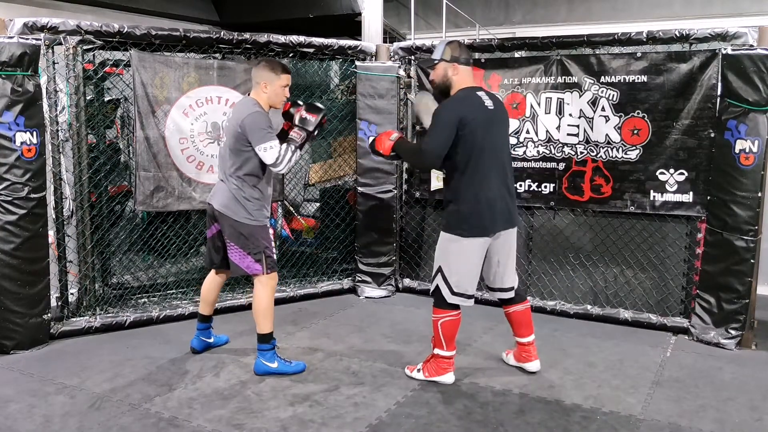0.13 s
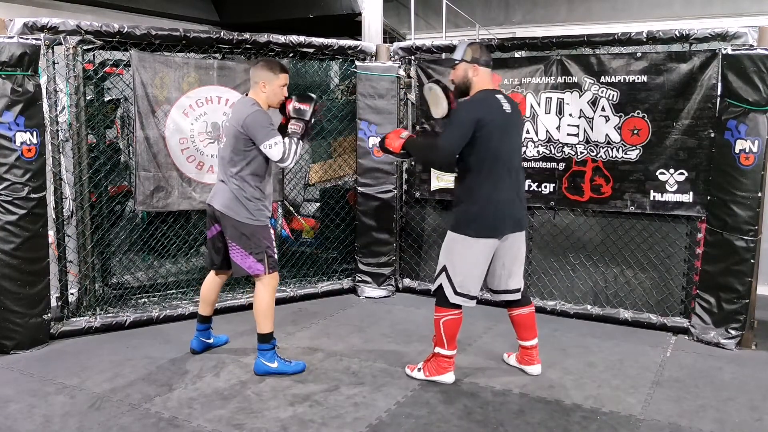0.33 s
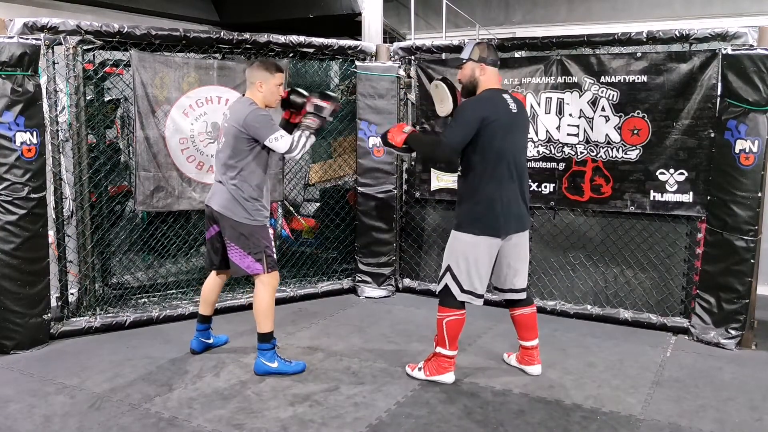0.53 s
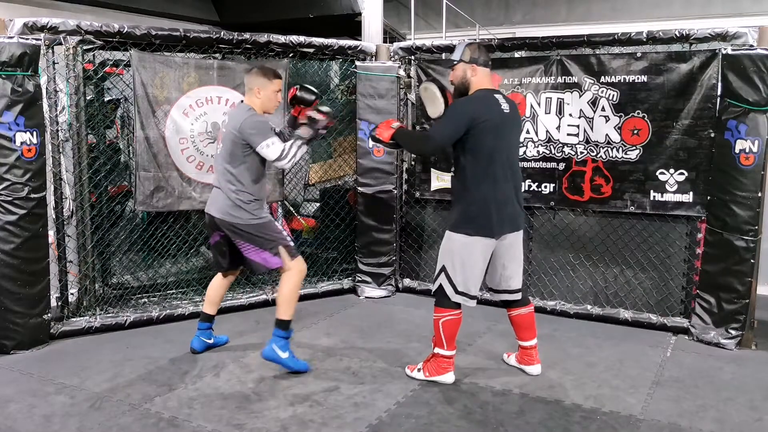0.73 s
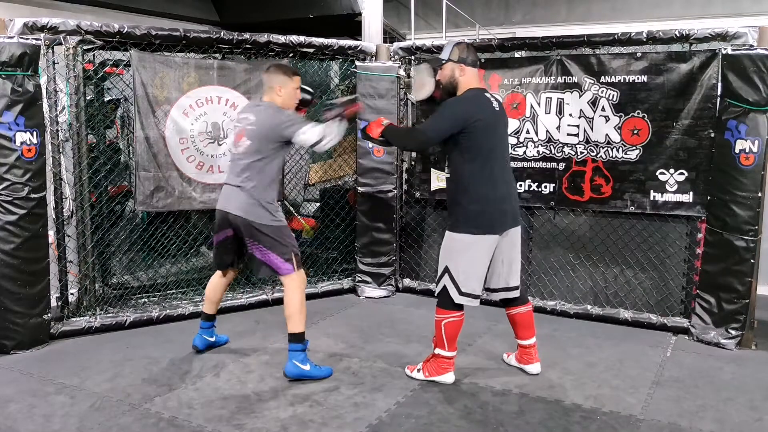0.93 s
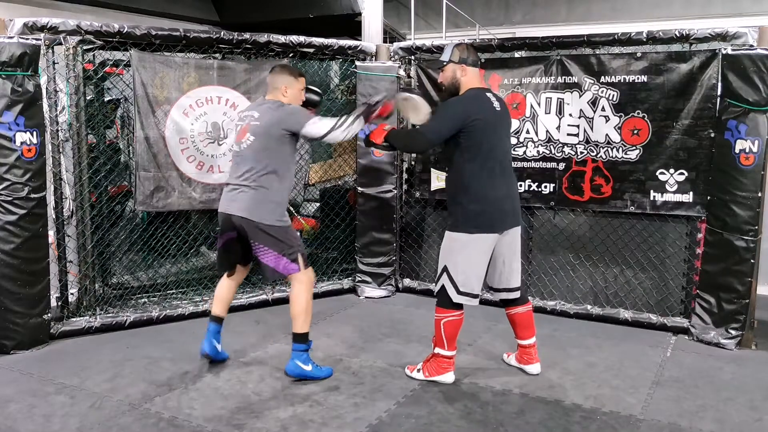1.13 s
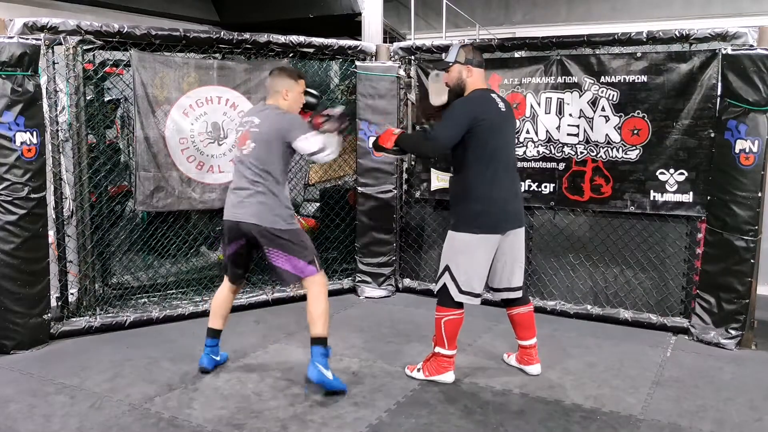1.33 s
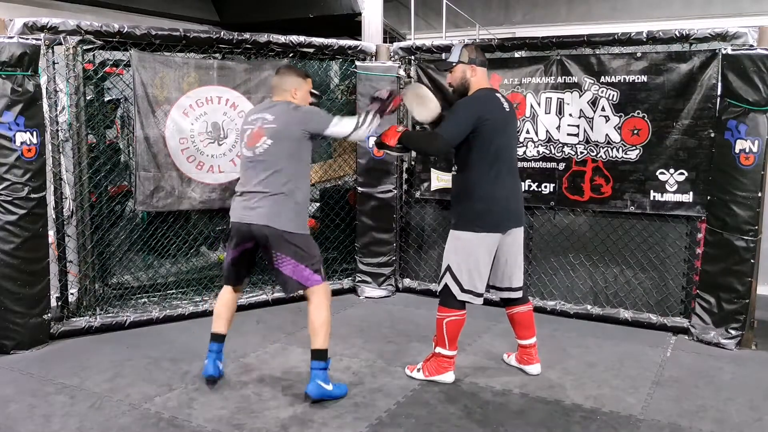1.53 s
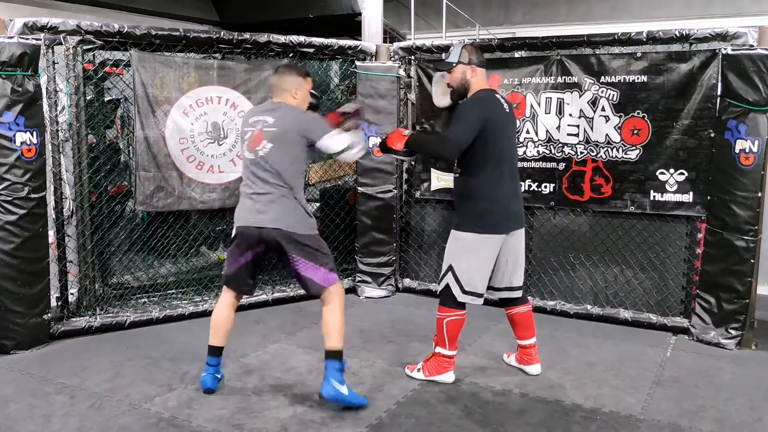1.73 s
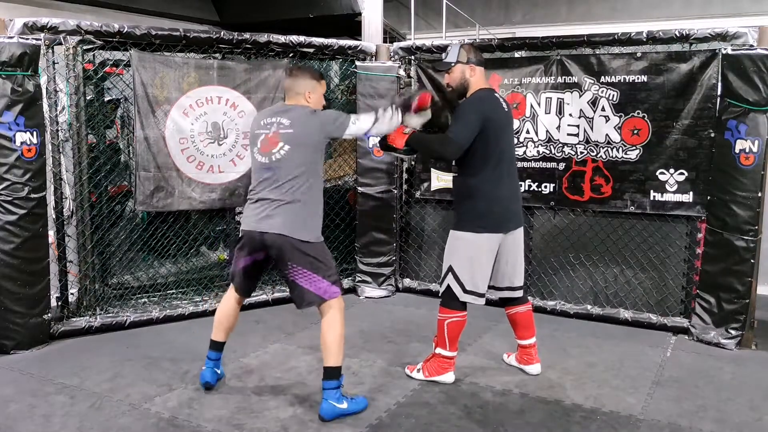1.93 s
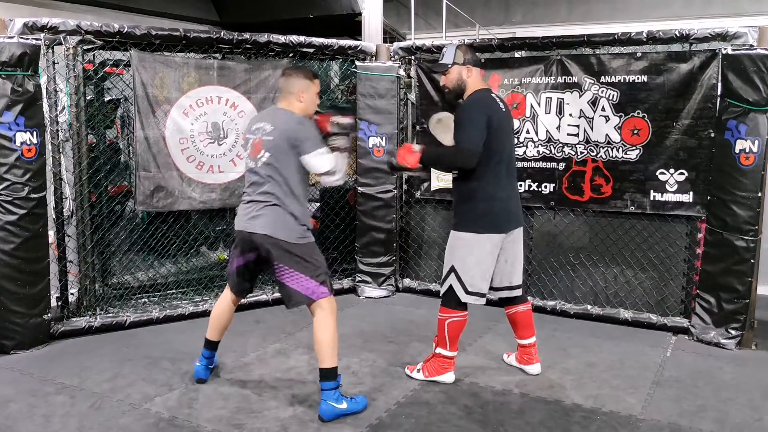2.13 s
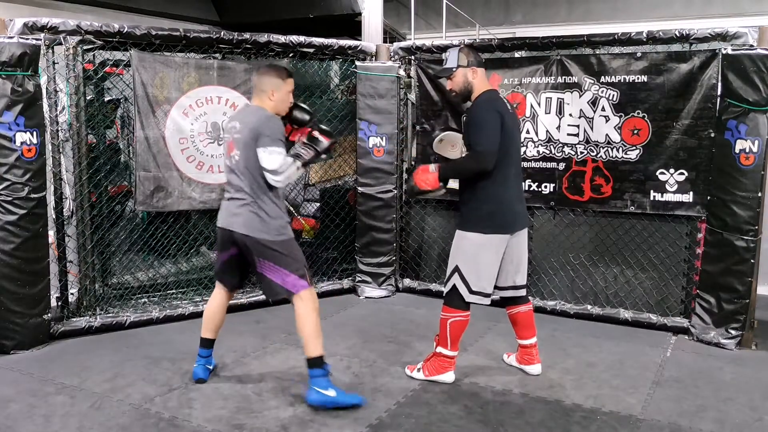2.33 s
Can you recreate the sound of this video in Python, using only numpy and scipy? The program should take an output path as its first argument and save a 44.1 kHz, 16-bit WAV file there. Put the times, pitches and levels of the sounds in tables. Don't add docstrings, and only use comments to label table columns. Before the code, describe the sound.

Leather glove jabs crack into a mitt three times, first softer, with shoe scuffs and ringing hall

```python
import sys
import numpy as np
from scipy import signal
from scipy.fft import rfft, irfft
from scipy.io import wavfile

SR = 44100
rng = np.random.default_rng(int(sys.argv[2]) if len(sys.argv) > 2 else 0)


def gain_from_decibels(decibels):
    exponent = np.asarray(decibels, float) / 20
    return 10 ** exponent


def int16_out(signal):
    q = np.round(np.clip(np.atleast_2d(signal).T, -1, 1) * 32767)
    wavfile.write(sys.argv[1], SR, q.astype(np.int16))


N = 109764

BAND_EDGES = 22 * 2 ** np.arange(0, 9.7, 1 / 3)
BANDS = np.sqrt(BAND_EDGES[1:] * BAND_EDGES[:-1])

# (time [s], snap peak level [dB])
CONTACTS = [
    (.8387, -12),
    (1.25632, 1),
    (1.6501, -2),
]
# (thump level [dB], tail level [dB], tail brightness [dB per octave])
JABS = [
    (-18, -24, -1.0),
    (-15.5, -20.5, 1.5),
    (-13.5, -20, 0.49),
]
# (frequency [Hz], level to the left [dB])
BASS_PAN = [(25, -1.5), (60, 3.5), (125, .1), (300, 0)]


def at_hz(points, hz):
    table_hz, values = np.array(points).T
    return np.interp(np.log(hz), np.log(table_hz), values)


def share(points):
    power = gain_from_decibels(2 * at_hz(points, BANDS)) * BANDS
    return power / np.sum(power)


def bump(centre_hz, octaves):
    bell = spike(np.log2(BANDS / centre_hz), 0, octaves)
    return bell / np.sum(bell)


def drift(rate):
    r = np.exp(-80 * np.pi * rate / SR)
    slow = signal.lfilter([1], [1, -2 * r, r * r], rng.standard_normal(N // 40 + 2002))[2000:]
    return np.interp(np.arange(N) / 40, np.arange(len(slow)), slow / slow.std())


def spike(t, s, width_s):
    return np.exp(-.5 * ((t - s) / width_s) ** 2)


def ring(t, hz, t60):
    t = np.maximum(t, 0)
    return np.sin(2 * np.pi * hz * t) * gain_from_decibels(-60 * t / t60)


def fade(t, rise_s, t60):
    t = np.maximum(t, 0)
    return (1 - np.exp(-t / rise_s)) ** 2 * gain_from_decibels(-120 * t / t60)


def leather_snaps(t):
    # (delay [ms], level [dB], width [ms])
    snap_steps = [
        (0, 0, .018),
        (.12, -9, .02),
        (.24, -9, .03),
        (.08, -17, .1),
        (-1.7, -24, .018),
    ]
    snaps = np.zeros(len(t))
    for ms, db, width_ms in snap_steps:
        level_luck, time_luck = rng.normal(0, 1, 2)
        snaps -= gain_from_decibels(db + 1.5 * level_luck) * spike(t, (ms + 0.005 * time_luck) / 1000, width_ms / 1000)
    rebound = signal.butter(1, 930, "high", fs=SR)
    return signal.lfilter(*rebound, snaps) - gain_from_decibels(-10) * ring(t, 2000, .003)


def squeezed_air(t):
    before_s, after_s, centre_hz = .0015, .0003, 3500
    band = signal.butter(1, [centre_hz / 2, centre_hz * 2], "band", fs=SR)
    hiss = signal.lfilter(*band, rng.standard_normal(len(t)))
    return gain_from_decibels(-24) * hiss * np.exp(-np.abs(t) / np.where(t < 0, before_s, after_s))


def pad_thump(t):
    # (frequency [Hz], level [dB], t60 [s])
    pad_modes = [(150, -6.5, 0.033), (343, -4.5, 0.046), (439, -4.5, 0.058), (1890, -35, 0.0037)]
    thump = -sum(gain_from_decibels(db + 0.75 * rng.normal()) * ring(t, hz, t60) for hz, db, t60 in pad_modes)
    return signal.lfilter(*signal.butter(2, 90, "high", fs=SR), thump)


def slap(t, snap_db, thump_db):
    return gain_from_decibels(snap_db) * (leather_snaps(t) + squeezed_air(t)) + gain_from_decibels(thump_db) * pad_thump(t)


def early_room(t):
    # (delay [ms], level [dB], dull above [Hz], left over right [dB])
    reflections = [
        (1.95, -2, 20000, 0),
        (2.82, 2, 5000, -1),
        (7.25, -5, 14000, -1),
        (8.08, 1, 5000, -2),
        (9.7, -4, 7000, -4),
        (13.3, -4, 7000, 3),
        (14.5, -7, 9000, 0),
    ]
    out = np.zeros((2, len(t)))
    out[:, 0] = 1
    for ms, db, dull_hz, pan_db in reflections:
        pulse = spike(t, ms / 1000, .13 / dull_hz + .25 / SR)
        out += gain_from_decibels([[db + pan_db / 2], [db - pan_db / 2]]) * pulse / pulse.sum()

    start_ms, end_ms, scatter_db, scatter_t60_s = 3.1, 70, -3.5, 0.17
    port_lag_s = .0004
    when, polarity, loss, direction = rng.random(size=(70, 4)).T
    s = (start_ms + (end_ms - start_ms) * when) / 1000
    size = np.where(polarity < .7, 1, -1) * gain_from_decibels(scatter_db - 60 * s / scatter_t60_s - 18 * loss)
    for side, sign in zip(out, (1, -1)):
        bearing = sign * (direction - .5)
        arrival = ((s + bearing * port_lag_s) * SR).astype(int)
        np.add.at(side, arrival, size * gain_from_decibels(18.0 * bearing))
    return out


def jabs():
    # (frequency [Hz], level [dB], t60 [s])
    room_modes = [(48.84, -42, 2), (159.7, -32, 1.04), (194, -41, 2.2), (281, -39.5, 1.56),
                  (316.6, -51.5, 2.1), (370.3, -37, 0.93), (428, -27, 0.51), (552, -48.5, 0.28)]
    out, t = np.zeros((2, N + SR)), np.arange(N) / SR
    short = np.arange(SR // 8) / SR
    for (s, snap_db), (thump_db, tail_db, _) in zip(CONTACTS, JABS):
        start = int(s * SR) - 441
        dry_slap = slap(short + start / SR - s, snap_db, thump_db)
        near = signal.fftconvolve(dry_slap[None], early_room(short), axes=1)
        out[:, start:start + near.shape[1]] += near
        for hz, db, t60 in room_modes:
            swell = 1 - np.exp(-np.maximum(t - s, 0) * hz / 3.0)
            pan = at_hz(BASS_PAN, hz) * np.array([[1], [-1]])
            level = gain_from_decibels(db + tail_db + 21 + rng.normal(0, 0.81) + pan)
            out[:, :N] += level * swell * ring(t - s, hz * rng.uniform(1.0, 1.01), t60)
    return out[:, :N]


def tails(t):
    # (frequency [Hz], level [dB per Hz])
    tail_spectrum = [(35, -7.5), (52, -4.5), (88, -10.5), (170, -9), (430, -6), (750, -10), (3000, -13),
                     (16000, -30)]
    # (frequency [Hz], t60 [s])
    early_t60 = [(40, 0.4), (150, 0.33), (400, 0.89), (1000, 0.38), (3000, 0.53), (7000, 0.4),
                 (14000, 0.083)]
    # (frequency [Hz], t60 [s])
    late_t60 = [(40, 1.6), (150, 2.52), (400, 1.82), (1000, 0.97), (3000, 1.38), (7000, .7), (14000, 0.3)]
    # (frequency [Hz], level [dB])
    late_share = [(40, 0.5), (300, -6.5), (1000, -12.5), (4000, -23.5), (14000, -0.5)]
    # (time [s], tail level [dB], brightness [dB per octave])
    earlier_jab = (-0.37, -38, -0.56)
    hits = [(s, tail_db, tilt) for (s, _), (_, tail_db, tilt) in zip(CONTACTS, JABS)] + [earlier_jab]
    power = np.zeros((len(BANDS), len(t)))
    for k, (hz, part) in enumerate(zip(BANDS, share(tail_spectrum))):
        rise_s = .0055 + 0.5 / hz
        patches = gain_from_decibels(2 * 1.3 * drift(20.7))
        octaves = np.log2(max(hz, 400) / 400)
        for s, db, tilt in hits:
            early = fade(t - s, rise_s, at_hz(early_t60, hz))
            late_db = at_hz(late_share, hz) + (0.57 - 0.5) * tilt * octaves
            late = gain_from_decibels(2 * late_db) * fade(t - s, rise_s, at_hz(late_t60, hz))
            power[k] += gain_from_decibels(2 * (db + tilt * octaves)) * part * (early + late) * patches
    return power


def steps(t):
    # (time [s], level [dB], t60 [s], centre [Hz], spread [octaves])
    footfalls = [
        (.163, -65.5, 0.19, 3000, .15),
        (0.445, -68, 0.75, 1700, .7),
        (0.687, -52, 0.45, 800, 0.91),
        (.699, -53, 0.1, 500, .6),
        (1.134, -52, 0.2, 1350, 0.22),
        (1.545, -44, 0.21, 795, .6),
        (2.426, -58.5, 0.52, 1120, .9),
    ]
    power = np.zeros((len(BANDS), len(t)))
    for s, db, t60, centre_hz, octaves in footfalls:
        tread = fade(t - s, 0.00087, t60) * gain_from_decibels(2 * db + 3.0 * drift(120))
        power += np.outer(bump(centre_hz, octaves), tread)
    return power


def swishes(t):
    # (centre time [s], level [dB], half length [s], centre [Hz])
    brushes = [(.0, -69, 0.022, 7040), (0.46, -73, 0.025, 3930), (0.59, -66.5, 0.02, 6260),
               (0.702, -68.5, 0.029, 5000), (0.816, -60.5, .014, 6800), (0.872, -42, 0.016, 10800),
               (0.957, -55, 0.06, 11000), (1.15, -64.5, 0.06, 6030), (1.917, -58.5, 0.012, 7000),
               (2.064, -62, 0.0127, 4830), (2.126, -58.5, 0.016, 4300), (2.221, -59.5, 0.028, 6300),
               (2.295, -70, .04, 3000), (2.387, -64.5, 0.024, 6500), (2.447, -68, .02, 4960)]
    power = np.zeros((len(BANDS), len(t)))
    for s, db, half_s, centre_hz in brushes:
        stroke = gain_from_decibels(2 * db + 3.0 * drift(60)) * spike(t, s, half_s)
        power += np.outer(bump(centre_hz, 1), stroke)
    return power


def thuds():
    # (time [s], level [dB], frequency [Hz])
    shifts = [(0.107, -41, 38.9), (0.144, -38, 38), (.18, -43, 40), (0.27, -43, 34.6), (0.317, -50, 38.5),
              (0.442, -47, 45), (0.557, -46, 39), (.84, -24.5, 42.4), (1.264, -42.5, 54.3),
              (1.657, -25, 48)]
    t = np.arange(N) / SR
    swings = -sum(gain_from_decibels(db) * ring(t - s, hz, 0.081) for s, db, hz in shifts)
    return gain_from_decibels([[6], [-6]]) * swings


def fence():
    # (frequency [Hz], level [dB], t60 [s])
    fence_modes = [(157, -61.5, 1.5), (578, -64, 1.6), (716, -69, .7), (761, -76.5, 2.1)]
    t = np.arange(N) / SR + 1
    out = np.zeros((2, N))
    for hz, db, t60 in fence_modes:
        pan = rng.normal(0, 1.5) * np.array([[1], [-1]])
        out += gain_from_decibels(db + 60 / t60 + 3.7 * drift(12) + pan) * ring(t, hz, t60)
    return out


def room_rumble():
    # (frequency [Hz], level [dB per Hz])
    rumble = [(20, -2), (45, 1), (90, -12), (160, -11), (350, -17.5), (800, -27), (2400, -33.5),
              (16000, -49.5)]
    return np.array([gain_from_decibels(2 * -57 + 2.0 * drift(6)) * part for part in share(rumble)])


def diffuse():
    # (frequency [Hz], correlation)
    coherence = [(30, 0.87), (60, 0.32), (180, 0.76), (550, 0.71), (1400, 0.0091), (15000, 0.0076)]
    t = np.arange(N) / SR
    power = tails(t) + steps(t) + swishes(t) + room_rumble()
    white = rng.standard_normal((2, 2, N + 8000))
    out = np.zeros((2, N))
    for k, hz in enumerate(BANDS):
        band = signal.butter(2, BAND_EDGES[k:k + 2], "band", fs=SR, output="sos")
        noise = signal.sosfilt(band, white[k % 2])[:, 8000:]
        mid, side = noise / noise.std()
        alike, pan = np.clip(at_hz(coherence, hz), -1, 1), at_hz(BASS_PAN, hz)
        pair = np.sqrt(1 + alike) * mid + np.sqrt(1 - alike) * side * [[1], [-1]]
        out += np.sqrt(power[k] / 2) * gain_from_decibels([[pan], [-pan]]) * pair
    return out


def scene():
    return jabs() + diffuse() + thuds() + fence()


def low_pass(x):
    return signal.sosfilt(signal.butter(12, 16640, fs=SR, output="sos"), x)


def record(dry):
    hz = np.arange(N // 2 + 1) * SR / N + 1e-3
    presence_db = 2 * spike(hz, 7620, 370)
    shelf_db = -5 / (1 + np.exp(np.clip((8300 - hz) / 150, -50, 50)))
    edge = 1 / np.sqrt(1 + (hz / 15750) ** 120)
    hiss = gain_from_decibels(-79) * np.diff(rng.standard_normal((2, N + 1)))
    spectrum = (rfft(dry) * gain_from_decibels(presence_db + shelf_db) + rfft(hiss)) * edge
    heard = signal.lfilter(*signal.butter(2, 22, "high", fs=SR), irfft(spectrum, N))
    return low_pass(2 * np.tanh(heard / 2))


dry = scene()
out = record(dry)
int16_out(out)
```